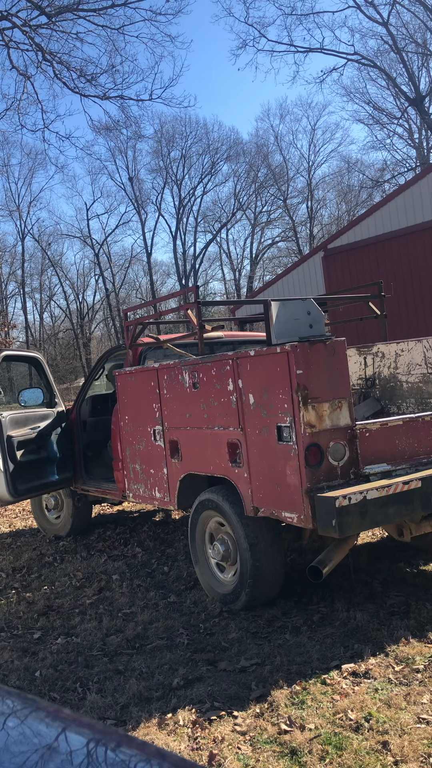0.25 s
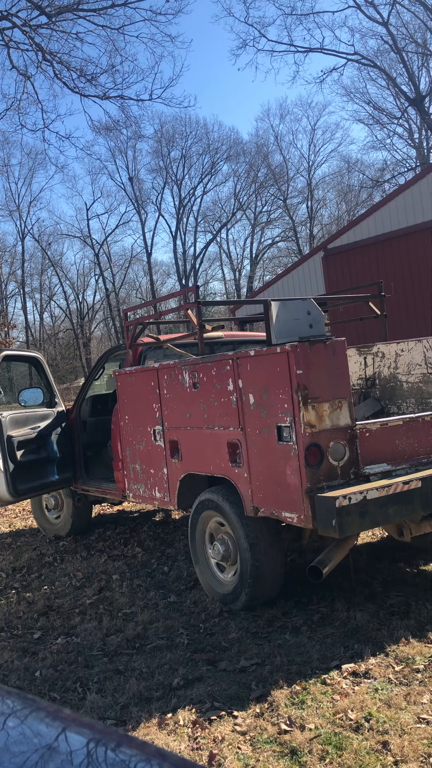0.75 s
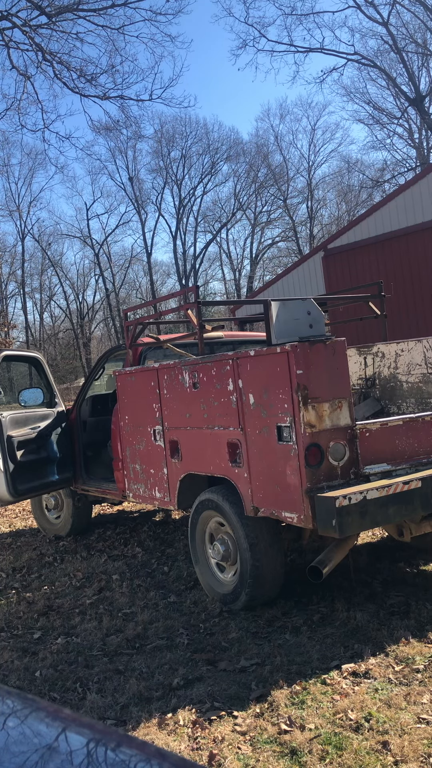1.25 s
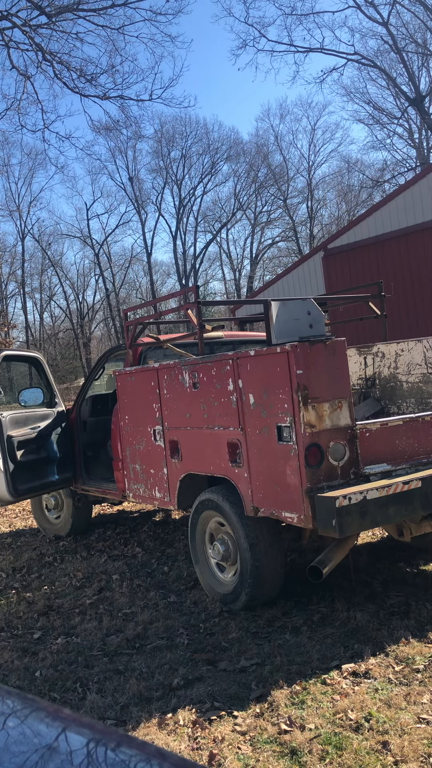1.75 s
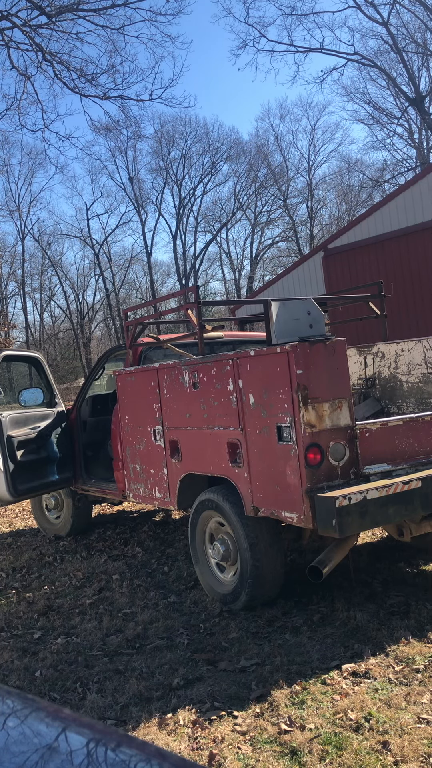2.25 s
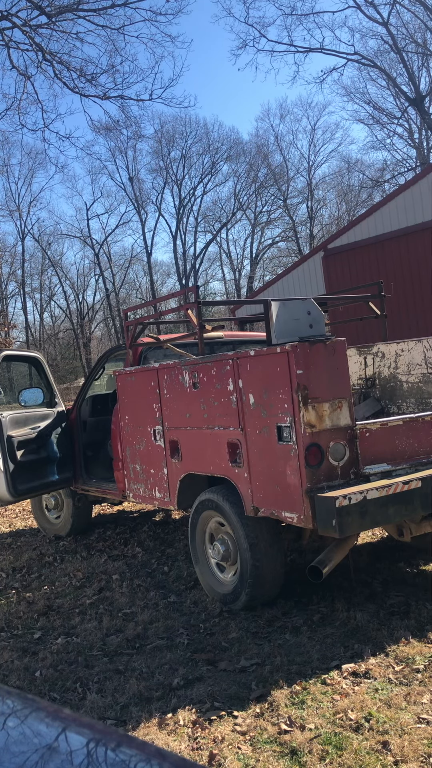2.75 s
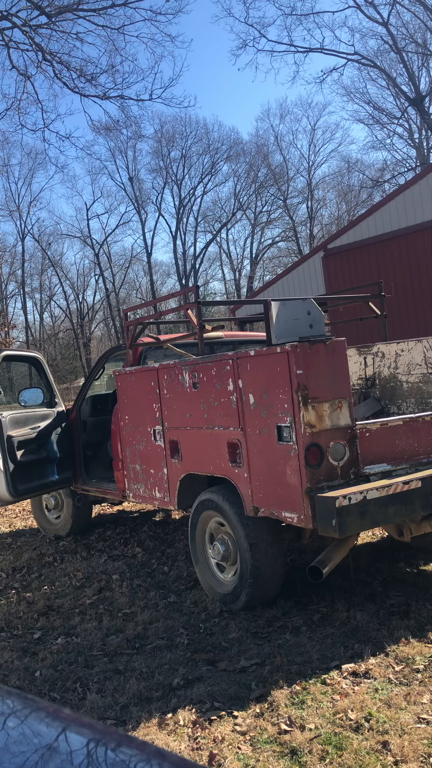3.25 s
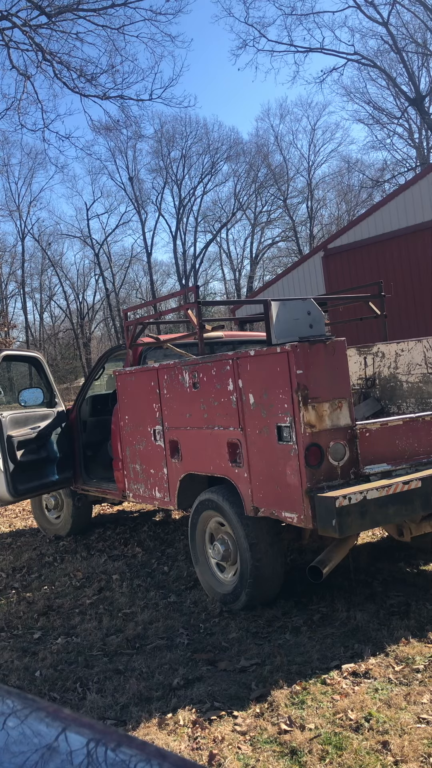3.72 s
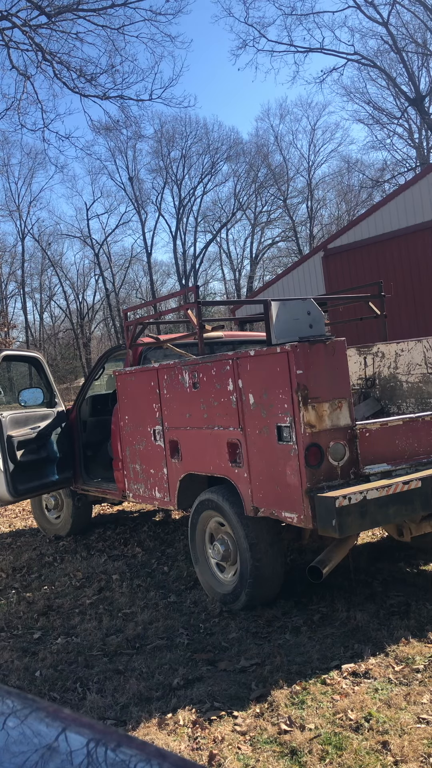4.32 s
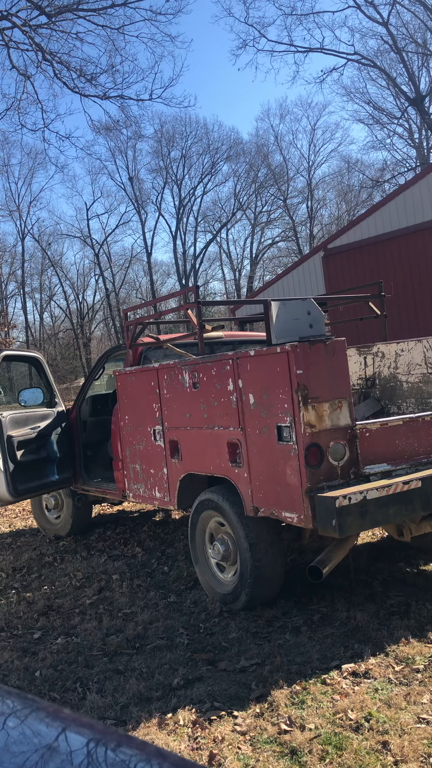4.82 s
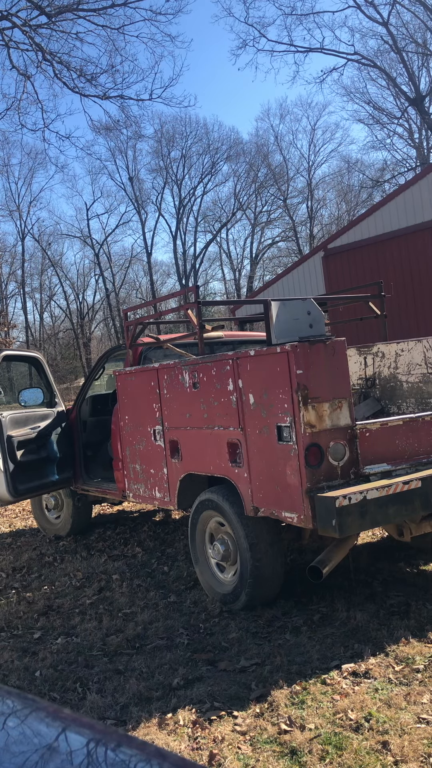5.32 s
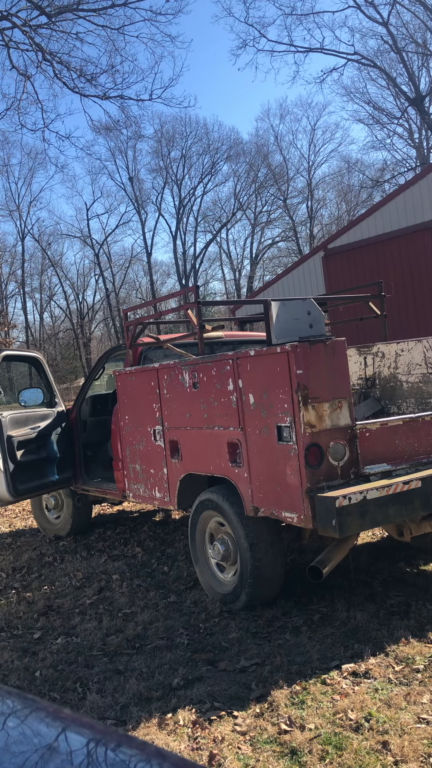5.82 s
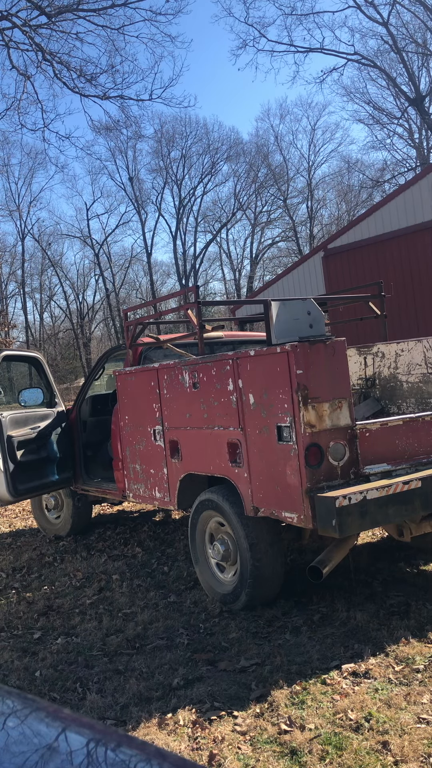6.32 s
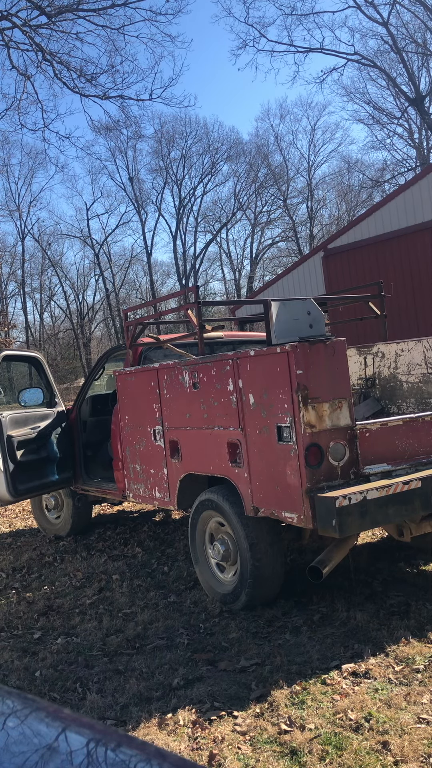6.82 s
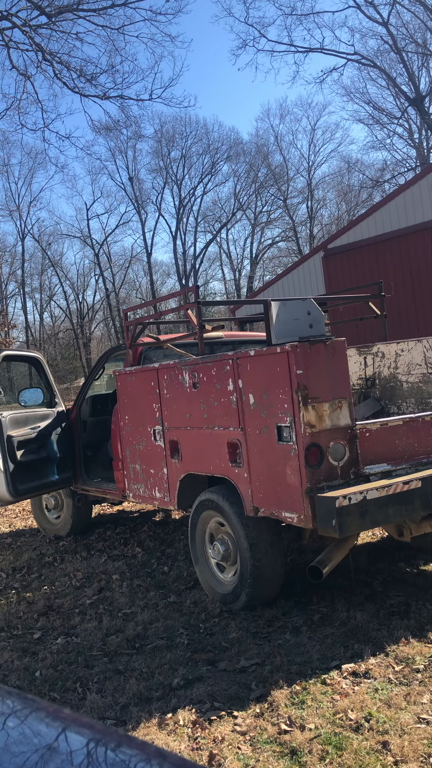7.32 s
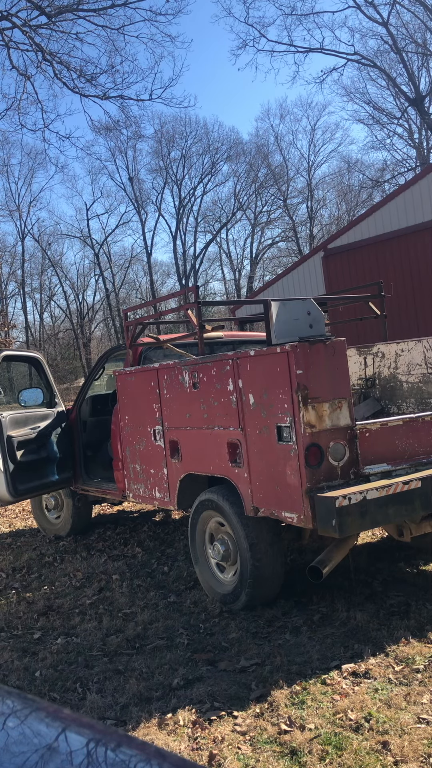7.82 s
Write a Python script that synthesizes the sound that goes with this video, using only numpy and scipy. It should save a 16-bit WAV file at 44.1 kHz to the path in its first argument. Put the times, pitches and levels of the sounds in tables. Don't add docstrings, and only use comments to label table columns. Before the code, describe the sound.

A quiet yard outdoors, with a soft, low, slightly swelling wash of far traffic and a barely heard distant hum. From 0 to 0.5 s a bird gives seven quick, buzzy upward notes, lightly echoed. Faint thin whistles and a falling rattle near 1.1 s follow, among tiny dry ticks; a duller tick falls at 1.8 s. From 3.1 to 3.85 s a second trill of ten notes, starting higher, descends slightly. A tick at 3.9 s, then near-stillness until a louder chattering call at 5.1 s and small clicks at 5.35 s. At 5.53 s a hard metal clack throws in the starter: its grinding whine climbs, sags around 5.9 s, eases and runs ahead. From 6.07 s to the end at about 8 s, loud ringing gear grind surges roughly every 0.19 s, each stroke dropping in pitch, then rattling loose with hiss over a low frame drone. The engine does not catch.

```python
import sys
import numpy as np
from scipy import signal
from scipy.fft import rfft, irfft, next_fast_len
from scipy.io import wavfile
from scipy.ndimage import uniform_filter1d

SR = 44100
rng = np.random.default_rng(int(sys.argv[2]) if len(sys.argv) > 2 else 0)


def nominal_scale(level):
    x = np.asarray(level, float) / 20
    return 10 ** x


def master_out(mix):
    frames = np.transpose(np.atleast_2d(mix))
    ceiling = np.clip(frames, -1, 1)
    pcm = np.round(ceiling * 32767).astype(np.int16)
    wavfile.write(sys.argv[1], SR, pcm)


N = 355887
T = np.arange(N) / SR


def evened(x):
    return x / np.sqrt(np.mean(x ** 2) + 1e-20)


def coloured(x, points):
    size = next_fast_len(len(x))
    hz, db = np.transpose(points)
    gain_db = np.interp(np.log(np.fft.rfftfreq(size, 1 / SR) + 1), np.log(hz + 1), db)
    return evened(irfft(rfft(x, size) * nominal_scale(gain_db), size)[:len(x)])


def ring(x, modes):
    out = np.zeros(len(x))
    for k, (hz, width, db) in enumerate(modes):
        r = np.exp(-np.pi * width / SR)
        feedback = [1, -2 * r * np.cos(2 * np.pi * hz / SR), r * r]
        out += (-1) ** k * nominal_scale(db) * signal.lfilter([1 - r, 0, r - 1], feedback, x)
    return out


def drift(hz):
    pole = np.exp(-2 * np.pi * hz / SR)
    return evened(signal.lfilter([1], [1, -2 * pole, pole ** 2], rng.standard_normal(N)))


def add(mix, s, sound):
    at = round(s * SR)
    part = mix[max(at, 0):][:len(sound) + min(at, 0)]
    part += sound[max(-at, 0):][:len(part)]


def sine(hz):
    return np.sqrt(2) * np.sin(2 * np.pi * np.cumsum(hz) / SR)


def yard_air():
    # (frequency [Hz], level [dB per Hz])
    wash_colour = [(15, -43), (25, -44), (44, -8), (82, -5.5), (119, -3), (194, -9.5), (228, -12.5),
                   (261, -14.5), (459, -20), (555, -21), (831, -22), (1240, -28.5), (3030, -38.5),
                   (5480, -40), (15700, -50.5)]
    # (time [s], swell [dB], level of the engine hum [dB])
    traffic = [
        (0, 0.5, -70),
        (1, 0.5, -61),
        (2, 0.5, -84),
        (3, -0.5, -76),
        (3.9, 1, -79),
        (4.5, -1.5, -63.5),
        (5.5, 0, -56),
        (8.1, 0.5, -81),
    ]
    s, swell_db, hum_db = np.transpose(traffic)
    wash_db = -56 + np.interp(T, s, swell_db) + 0.51 * drift(hz=1.4)
    wash = coloured(rng.standard_normal(N), wash_colour) * nominal_scale(wash_db)
    hum_level = nominal_scale(np.interp(T, s, hum_db) + 2.0 * drift(hz=2.3))
    return wash + hum_level * sine(119.3 + 1.506 * drift(hz=2.63))


def syllable(db, hz):
    t = np.arange(-.03, .016, 1 / SR)
    roughness = evened(uniform_filter1d(rng.standard_normal(len(t)), size=40))
    buzz = 0.32 + .6 * np.cos(2 * np.pi * 420 * t) + 0.3 * roughness
    lead = sine(hz * (.8 + 0.227 * np.clip((t + .027) / .019, 0, 1) ** 2)) * buzz
    lead *= nominal_scale(-6.5) * np.clip((t + 0.034) / 0.015, 0, 1) ** 1.5 * np.clip((-.007 - t) / 0.0049, 0, 1)

    drop = .2 * max(hz - 5100, 0) / 1000
    climbing = 0.36 * (abs(.0055 - t) / 0.0115) ** 1.8
    falling = drop * ((t - .0055) / 0.0072) ** 2
    sweep = hz * (1 - np.where(t < .0055, climbing, falling))
    rise = .12 * np.clip((t + .009) / .006, 0, 1) + np.clip((t + 0.0016) / 0.0018, 0, 1)
    dip = 1 - .45 * np.exp(-((t - .0045) / 0.00097) ** 2)
    fade = nominal_scale(-500 * np.maximum(t, 0)) * np.clip((.0145 - t) / .003, 0, 1)
    return nominal_scale(db - 4.5) * (lead + sine(np.maximum(sweep, 500)) * rise * dip * fade)


def glide(length, db, start_hz, middle_hz, end_hz):
    u = np.linspace(0, 1, round(length * SR))
    hz = np.polyval(np.polyfit([0, .5, 1], [start_hz, middle_hz, end_hz], 2), u)
    flutter = nominal_scale(3.5 * evened(uniform_filter1d(rng.standard_normal(len(u)), size=300)))
    return nominal_scale(db) * sine(hz) * flutter * signal.windows.tukey(len(u), .4)


def thin_whistle(length, db, hz):
    t = np.arange(0, length, 1 / SR)
    on, off = np.clip(t / 0.0135, 0, 1), np.clip((length - t) / .009, 0, 1)
    bend = 1 - 0.24 * (1 - on) ** 2 - .25 * (1 - off) ** 2
    flutter = 1 + 0.31 * np.sin(2 * np.pi * 70 * t)
    return nominal_scale(db) * sine(hz * bend) * (0.13 + 0.65 * on * off) * flutter


def birds():
    # (time [s], peak level [dB], top pitch [Hz])
    trill = [(.003, -46, 5620), (.081, -49.5, 5440), (0.155, -47, 5650), (.228, -47.5, 5750),
             (.32, -49, 5610), (.406, -50, 5600), (.492, -52.5, 5380),
             (3.144, -53.5, 6900), (3.224, -51, 6440), (3.295, -51.5, 6300), (3.37, -50, 6230),
                   (3.441, -49, 6160), (3.513, -48.5, 6300), (3.589, -49, 5930), (3.667, -51, 5960),
                   (3.745, -54, 5970), (3.835, -57, 5730)]
    # (time [s], length [s], level [dB], pitch [Hz])
    whistles = [(3.028, 0.056, -65, 7600), (3.377, .07, -69, 8270), (3.494, .05, -61, 7200),
                (2.888, 0.041, -72, 5700), (0.676, 0.046, -75, 5700), (0.756, .07, -81, 5700),
                (1.468, 0.083, -82, 5680), (1.57, 0.045, -79, 5630), (2.138, 0.035, -73, 5570),
                (2.221, .03, -75, 5600), (3.705, .03, -82, 7250)]
    # (time [s], length [s], level [dB], top pitch [Hz])
    arches = [(0.478, .055, -73, 7300), (0.468, 0.058, -76, 8700), (.565, .053, -73, 7300),
              (.565, .05, -81, 8800), (1.108, .012, -77, 5600), (5.08, .01, -78, 5500),
              (5.12, .012, -67, 5350)]
    # (time [s], length [s], level [dB], pitch [Hz])
    low_notes = [(1.318, 0.13, -72, 2690), (1.469, 0.072, -78, 2700), (5.262, .13, -71.5, 2660),
                 (5.387, 0.13, -77, 2620)]
    # (time [s], number of chips, level [dB], first pitch [Hz])
    rattles = [
        (1.119, 5.6, -63, 3640),
        (1.233, 5.9, -68, 3050),
        (5.13, 4.5, -57.5, 3550),
        (5.233, 2, -62, 3380),
    ]
    # (time [s], length [s], level [dB], pitch [Hz], width [Hz])
    far_calls = [(0.597, .27, -79, 2850, 500), (2.92, 0.16, -79, 3000, 300), (3.872, 0.052, -80, 3000, 100),
                 (4.4, 0.47, -79, 3100, 600), (0.018, 0.18, -77, 6900, 900), (1.704, .15, -76, 3030, 300),
                 (5.092, 0.093, -77, 5300, 500)]
    mix = np.zeros(N)
    for s, db, hz in trill:
        add(mix, s - .03, syllable(db, hz))
    for s, length, db, hz in whistles:
        add(mix, s, thin_whistle(length, db, hz))
    for s, length, db, hz in arches:
        add(mix, s, glide(length, db, .92 * hz, hz, .93 * hz))
    for s, length, db, hz in low_notes:
        add(mix, s, glide(length, db, 1.01 * hz, hz, .995 * hz))
    for s, count, db, first_hz in rattles:
        for k in range(round(count)):
            hz = first_hz * (1 - 0.0217 * k)
            chip = glide(0.008 + 0.001 * k, db - 12 / (1 + k), 0.95 * hz, hz, 1.07 * hz)
            add(mix, s + k * 0.018, chip)
    for s, length, db, hz, width in far_calls:
        noise = rng.standard_normal(round(length * SR))
        blur = ring(ring(noise, [(hz, width, 0)]), [(hz, width, 0)])
        add(mix, s, nominal_scale(db) * evened(blur) * signal.windows.tukey(len(blur), .6))

    t = np.arange(SR) / SR
    echo_t60 = 0.6
    echoes = rng.choice([-1., 1.], SR) * (rng.random(SR) < 1500 / SR)
    echoes *= nominal_scale(-60 * t / echo_t60) * (t > .012)
    return mix + nominal_scale(-9) * signal.fftconvolve(mix, echoes / np.linalg.norm(echoes))[:N]


def ticks():
    # (time [s], peak level [dB], tilt [dB per octave])
    snaps = [(.1034, -62, -1.5), (.6479, -57, -1.5), (1.1747, -57, -3), (1.239, -56, -4),
             (1.3064, -65, 1.1), (1.7816, -47.5, -6), (2.3444, -67, 2.1), (3.8192, -66, -1.5),
             (3.931, -52, -3.5), (5.334, -54.5, -7), (5.3527, -50, -5), (5.471, -58, -6)]
    mix, t = np.zeros(N), np.arange(2048) / SR
    tick_t60 = .016
    for s, db, tilt_db in snaps:
        snap = coloured(rng.standard_normal(len(t)), [(200, -40), (500, -3 * tilt_db), (16000, 2 * tilt_db)])
        add(mix, s, nominal_scale(db - 1.0 - 60 * t / tick_t60) * snap)
    return mix


def solenoid():
    # (time [s], level [dB], time to fade by 60 dB [s])
    throws = [
        (5.531, -42, 0.028),
        (5.538, -29.5, 0.1),
    ]
    # (frequency [Hz], width [Hz], level [dB])
    clack_modes = [(1830, 240, 11), (4380, 900, 8.5), (8500, 2100, -7), (14100, 2700, -8)]
    mix, t = np.zeros(N), np.arange(8000) / SR
    for s, db, t60 in throws:
        clack = evened(ring(rng.standard_normal(len(t)), clack_modes))
        add(mix, s, nominal_scale(db - 60 * t / t60) * clack)
    return mix


def crank():
    # (time [s], tooth rate [Hz], load [dB], clean share [0-1])
    spin_up = [
        (5.531, 280, -38.5, 0.01),
        (5.645, 525.7, -28, 0.02),
        (5.712, 574, -27.5, 0.82),
        (5.75, 696, -26.5, .8),
        (5.795, 755, -25, 0.82),
        (5.85, 574.8, -25.5, 0.72),
        (5.895, 520, -35, 0.1),
        (5.95, 600, -41.5, .2),
        (6.06, 955, -36, 0.1),
    ]
    # (time [s], load [dB], rise [s], slap after the top [dB])
    strokes = [(6.072, -25, .0041, -37), (6.273, -25.5, .0035, -33), (6.472, -25.5, .0048, -41),
               (6.633, -23.5, .0069, -31), (6.846, -23.5, .003, -47), (7.014, -24, .004, -29),
               (7.203, -23.5, .0038, -33), (7.386, -24, .0098, -36.5), (7.555, -24, 0.024, -33),
               (7.749, -23.5, .015, -42.5), (7.951, -23.5, 0.023, -47)]
    s, *columns = np.transpose(spin_up)
    hz, load_db, clean = (np.interp(T, s, c) for c in columns)
    hz = uniform_filter1d(hz, size=900)
    early = (T > s[0]) * (T < strokes[0][0] + .01)
    coasting = nominal_scale(-41.5) * (T > strokes[0][0])
    hiss_db = -12.5
    load, rush = nominal_scale(load_db) * early + coasting, nominal_scale(load_db + hiss_db) * early

    start_hz, slowest_s, clean_share = (1051.4, 913), (.078, .1), (0.29, 0.73)
    starts, _, rises, _ = np.transpose(strokes)
    tops_hz, slows, shares = (np.interp(rises, [0, .015], pair) for pair in (start_hz, slowest_s, clean_share))
    nexts = zip([*starts[1:], starts[-1] + .19], [*tops_hz[1:], tops_hz[-1]])
    sag, let_go_t60 = .38, 0.19
    first_top_s = 5.99
    slaps = [(first_top_s, -36, -45)]  # (s, slap dB, valve blow dB)
    for (s, db, rise, slap_db), top_hz, slow, share, (later, later_hz) in zip(strokes, tops_hz, slows, shares, nexts):
        u = T - s
        progress = np.clip(u / slow, 0, 1)
        slowing = top_hz * (1 - sag * progress ** 2.1)
        speeding = np.interp(T, [s + slow, later], [0, later_hz - top_hz * (1 - sag)])
        hz = np.where(u >= 0, slowing + speeding, hz)
        clean = np.where(u >= 0, share * np.interp(u, [slow, slow + 0.024], [1, .3]), clean)
        grip, past = np.clip(u / max(rise, .002), 0, 1), np.clip(u - slow, 0, 1)
        knock = nominal_scale(-1.5) * 0.0052 / max(rise, .002) * (u > 0) * np.exp(-abs(u) / 0.0043)
        load += grip * nominal_scale(db - 2.575 * progress - 60 * past / let_go_t60) + nominal_scale(db) * knock
        rush += grip * nominal_scale(db + hiss_db - 1.8 * progress - 60 * past / 0.25)
        slaps.append((s + rise + 0.11, slap_db, db - 18))

    shudder = (T < first_top_s) * 0.62
    slap_s = 0.027
    for s, db, blow_db in slaps:
        load += nominal_scale(db) * np.interp(T, [s, s + 0.0018, s + slap_s, s + 2 * slap_s], [0, 0.69, 0.25, 0.079])
        rush += nominal_scale(blow_db) * np.interp(T, [s, s + 0.013, s + 0.11, s + 0.14], [0, 1, 1, 0])
        shudder = np.maximum(shudder, np.interp(T, [s - .12, s + 0.011, s + 0.057], [0, 1, 0]))
    return hz, load, np.clip(clean, 0, 1), rush, shudder


def starter():
    # (frequency [Hz], width [Hz], level [dB])
    housing_modes = [(728, 82, -8), (861, 17, 4.5), (902.5, 15.4, 3), (1042, 21.6, 6.5), (1156, 39, -1),
                     (1523, 59, 2), (1650, 45, -3), (1793, 40, -0.5), (1993, 103, -8), (2198, 40, -5),
                     (2524, 22, -12.5)]
    cover_modes = [(2620, 70, -5), (3200, 80, -5), (4330, 90, 1), (4630, 90, 0), (5500, 150, -7),
                   (6200, 200, -8)]
    frame_modes = [(52, 12, -7), (212, 18.5, 0), (365.5, 21, 0.5), (430.3, 8.5, 2.5), (499, 17, -3),
                   (151, 165, -11)]
    # (frequency [Hz], level [dB per Hz])
    grind_colour = [(180, -52), (300, -35), (361, -23), (560, -12), (877, -7.5), (1270, -9.5), (1560, -10),
                    (2180, -19.5), (4000, -27), (5200, -59), (8800, -120)]
    hiss_colour = [(1470, -16), (2500, 0), (2980, -3.5), (3870, -6), (4520, -6), (4880, -7.5), (6000, -7),
                   (7330, -16), (8100, -14.5), (11400, -23.5), (15700, -24.5)]
    hz, load, clean, rush, shudder = crank()
    turns = np.cumsum(hz * (1 + 0.017 * drift(hz=60))) / SR
    overtones_db = [1.16, 1.8, 1.6, 0.5, 0.6]
    teeth = sum(np.cos(2 * np.pi * k * turns) * nominal_scale(db) for k, db in enumerate(overtones_db, 1))
    teeth *= (1 + 0.45 * np.cos(2 * np.pi * turns / 22)) * nominal_scale(2.4 * drift(hz=60))
    scrape = rng.standard_normal(N) * (0.49 + np.exp(-(turns % 1) / 0.2)) * nominal_scale(1.9 * drift(hz=123))
    drive = load * (np.sqrt(clean) * evened(teeth) * nominal_scale(-8) + np.sqrt(1 - clean) * evened(scrape))
    ringing = evened(ring(drive, housing_modes))
    grind = evened(ringing + nominal_scale(-7.0) * coloured(drive, grind_colour)) * np.std(load)

    fizz = rush * evened(rng.standard_normal(N) * nominal_scale(0.9 * drift(hz=160)))
    covers = evened(ring(rush * rng.standard_normal(N), cover_modes))
    hiss = evened(coloured(fizz, hiss_colour) + nominal_scale(-5) * covers) * np.std(fizz)

    drone_level = np.clip((T - 5.534) / 0.0074, 0, 1) * nominal_scale(-46.5 + 7.5 * shudder)
    return grind + hiss + drone_level * evened(ring(rng.standard_normal(N), frame_modes))


def scene():
    return (yard_air() + birds() + ticks() + solenoid() + starter())[None]


def band_limit(x):
    return signal.sosfilt(signal.butter(12, 15830, fs=SR, output="sos"), x)


def record(dry):
    treble_cut = signal.firwin(511, 15780, window=("kaiser", 9), fs=SR)
    mix = signal.oaconvolve(dry, treble_cut[None], "same")
    return band_limit(mix)


dry = scene()
out = record(dry)
master_out(out)
```